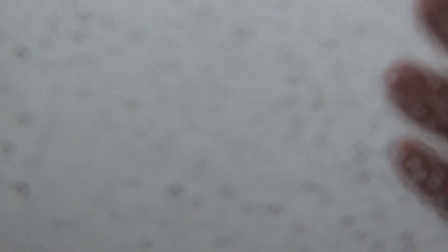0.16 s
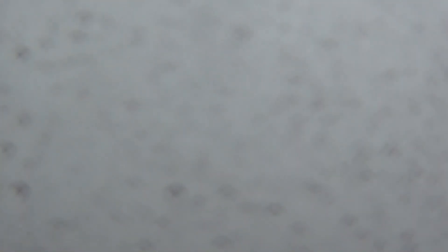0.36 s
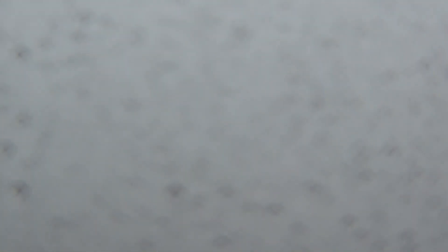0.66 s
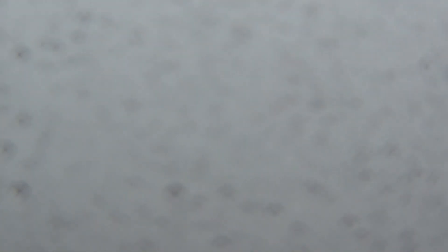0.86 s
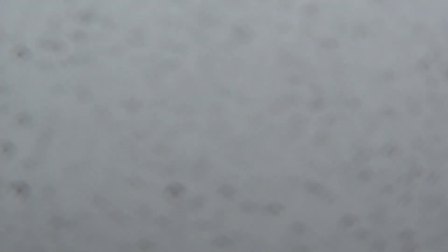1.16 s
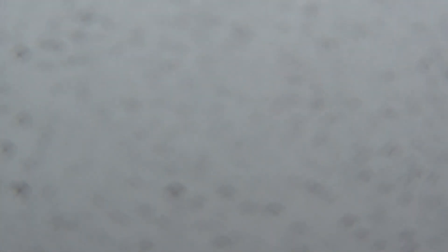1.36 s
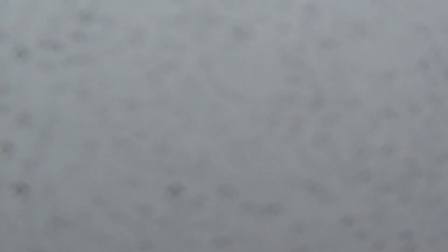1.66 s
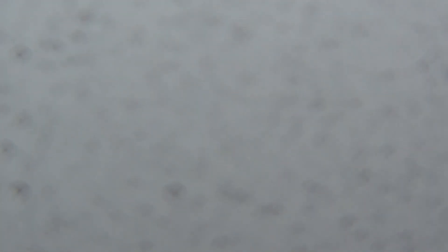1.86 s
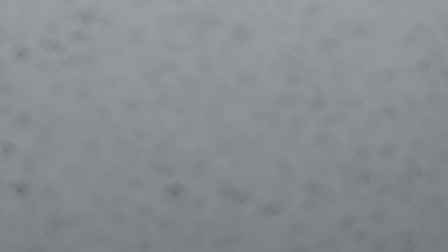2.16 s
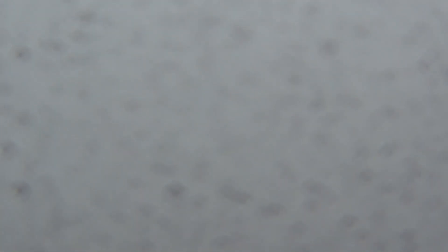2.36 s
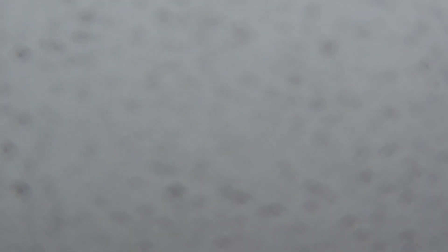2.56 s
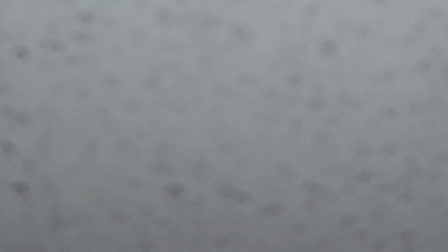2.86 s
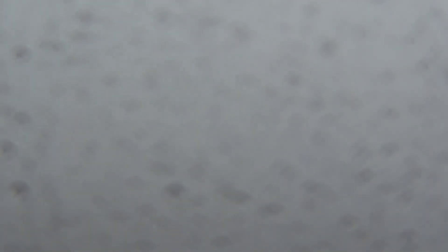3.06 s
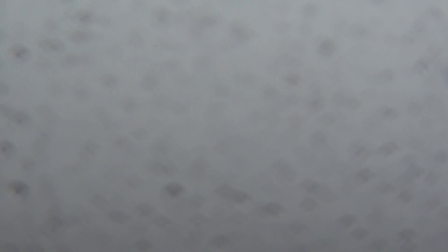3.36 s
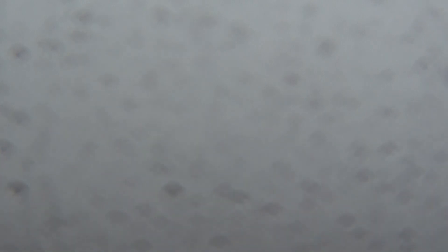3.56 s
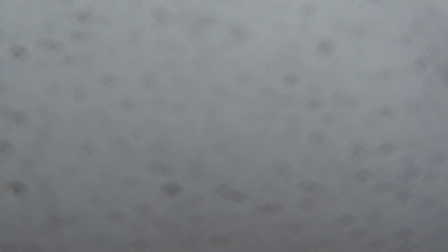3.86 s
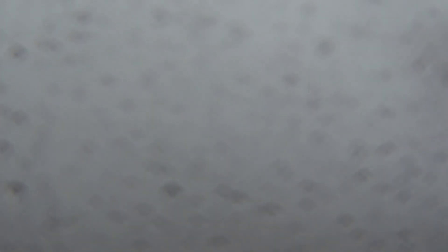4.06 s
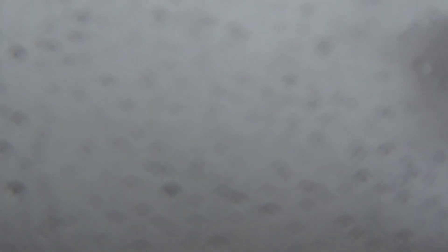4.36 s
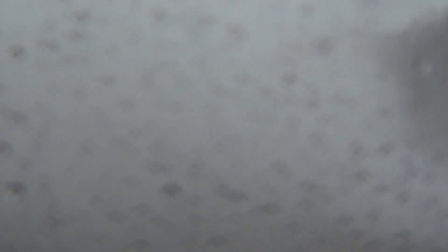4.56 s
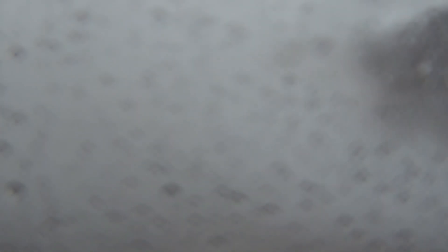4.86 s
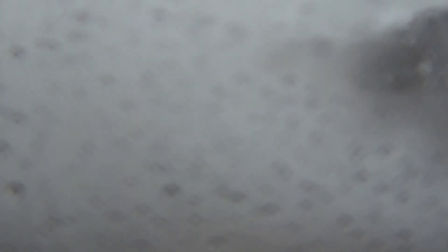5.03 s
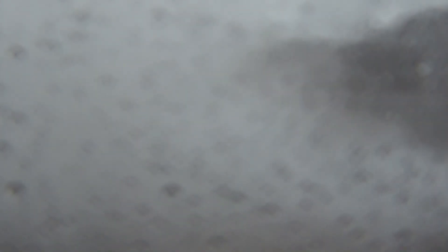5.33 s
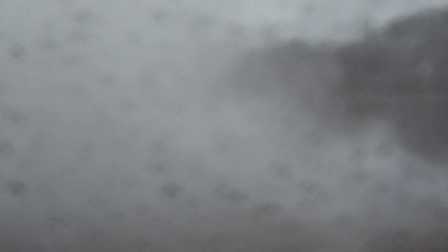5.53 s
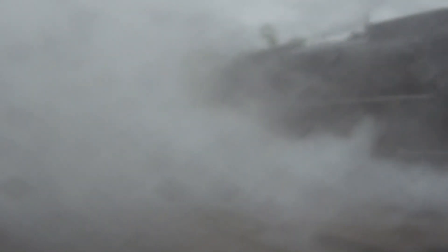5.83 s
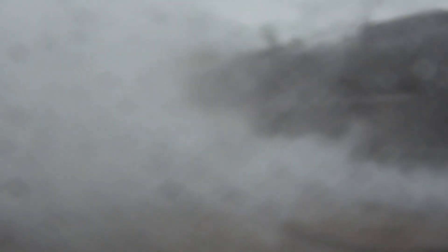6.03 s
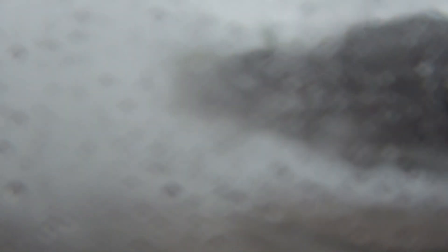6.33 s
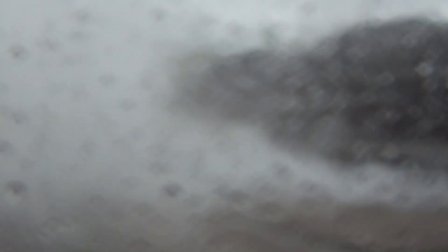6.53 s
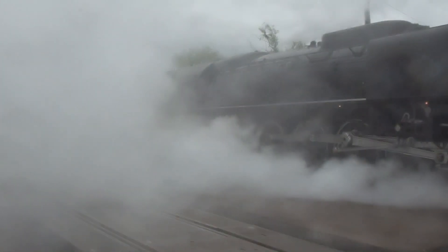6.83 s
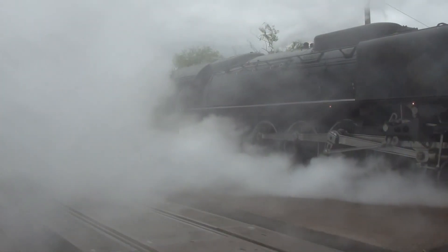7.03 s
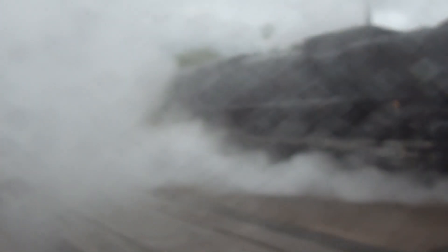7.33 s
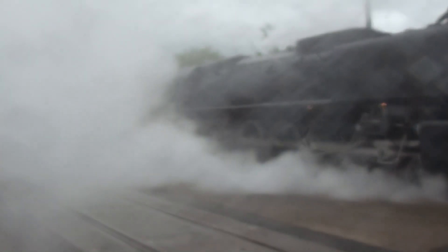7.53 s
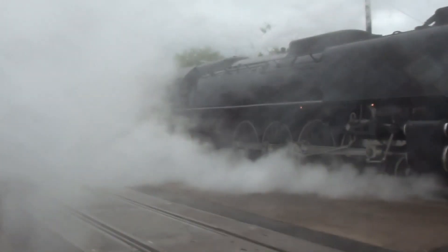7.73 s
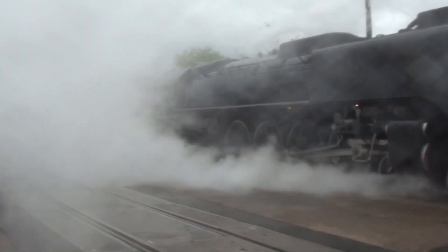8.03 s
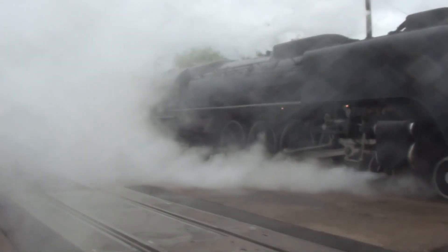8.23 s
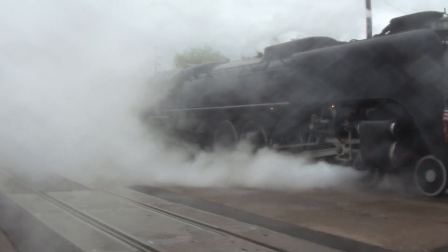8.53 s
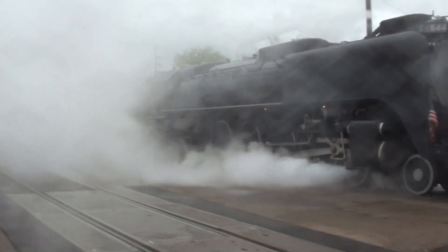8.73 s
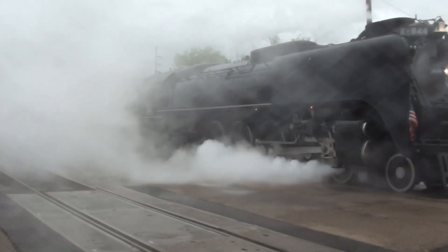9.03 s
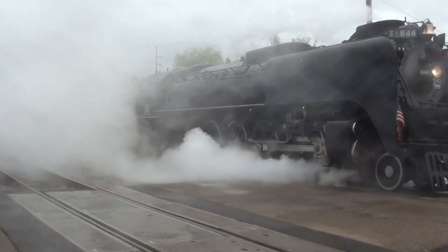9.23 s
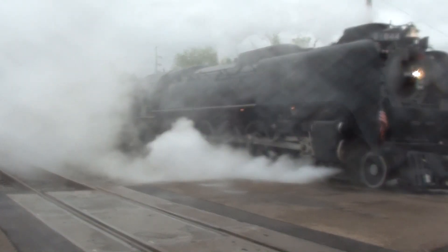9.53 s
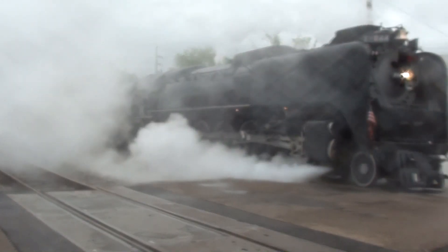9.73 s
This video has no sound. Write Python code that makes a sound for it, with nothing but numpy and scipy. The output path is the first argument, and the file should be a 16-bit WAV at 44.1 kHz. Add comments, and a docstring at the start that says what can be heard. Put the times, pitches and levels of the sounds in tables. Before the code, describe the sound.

Harsh steam jets hiss close by, cut off and return, fall to a soft leak with faint whine and squeals, then blast twice more.

```python
"""A large steam locomotive rolls slowly outdoors with its cylinder cocks open; noise jets hiss in five blasts.
The first is already blowing; its cloud buffets the microphone, muffles the treble, then the jet swings close.
Two more blasts follow. In the lull: a softer noise leak, faint whistles and wheel squeals of wavering sines.
Two last blasts end the scene. Dull noise puffs dot it; a thin sine turbine whine, hum and low noise lie beneath."""
import sys
import numpy as np
from scipy import signal
from scipy.fft import rfft, irfft
from scipy.io import wavfile
from scipy.ndimage import uniform_filter1d

SR = 44100
rng = np.random.default_rng(int(sys.argv[2]) if len(sys.argv) > 2 else 0)


def transcribe(u):
    """Save the signal u as a 16-bit wav file named by the first command-line argument.

    u: samples, shape (n,) or (channels, n), limited to [-1, 1]; the rate is SR.
    q: integer samples, one column per channel.
    """
    v = np.clip(np.atleast_2d(u).T, -1, 1)
    q = np.round(v * 32767).astype(np.int16)
    wavfile.write(sys.argv[1], SR, q)


N = 436149

# cock blasts: open_s, shut_s, opening_s, hiss_db, roar_re_hiss_db, growth_db_per_s,
# sag_at_shut_db (negative: rise), water_sputter_db, ground_echo_0_1, flank_echo_0_1
BLASTS = [ (-0.5, 3.32, 0.02, -22.3, -4.5, -0.25, 5.9, 0.36, 0.11, 0.4),
          (3.521, 4.722, 0.018, -17.8, -7.0, 3, 10.0, 0.1, 0.06, 0.14),
          (4.922, 6.13, 0.0322, -27.5, -5.5, 3.3, 15, 0.65, 0.14, 0.27),
          (8.278, 9.094, 0.1, -20.6, -7, -0.3, 2.0, 0.53, 0.44, 0.06),
          (9.342, 10.4, 0.0259, -21.6, -5.8, 0.7, -2, 0.47, 0.45, 0.26), ]
# jet spectra, one per blast, set by where the jet points: freq_hz, relative_db_per_hz
COLOUR_1 = [(350, -11.5), (470, -17), (650, -5), (850, -2.5), (1150, -6.5), (1600, -1), (2000, -1),
            (3200, -2.5), (4300, -2), (6100, -1.5), (7000, -1), (8200, -3.5), (9500, -10), (12400, -21)]
COLOUR_2 = [(200, -19), (450, -18), (880, -8), (1020, -13), (1350, -6.5), (1850, -8.5), (2700, -6.5),
            (4600, -5), (5400, -5), (7300, -1.5), (8400, -5), (9400, -13.5), (10500, -17.5), (12400, -26.5)]
COLOUR_3 = [(200, -28), (450, -16), (750, -10.5), (1000, -12), (1200, -4.5), (1500, -6.5), (2200, -5),
            (2500, -7.5), (3400, -6.5), (5800, -6.5), (7100, -1), (8500, -10), (10500, -17.5), (12400, -27)]
COLOUR_4 = [(200, -21.5), (420, -9.5), (600, -5), (920, 0.5), (1040, -7.5), (1480, -3), (2200, -6.5),
            (3500, -3.5), (4300, -6), (6400, -4), (7300, -1), (8600, -4), (10500, -17), (12400, -16.5)]
COLOUR_5 = [(260, -16.5), (400, -14), (600, -1.5), (930, -1.5), (1040, -5.5), (1700, -4.5), (2450, -3),
            (2900, -1.5), (3500, -1.5), (5000, -3), (7200, -2.5), (8400, -3), (10500, -14.5), (12400, -21)]
# steam direction: time_s, left_re_right_db (scaled by PAN_SHARE)
PAN = [(0, -0.5), (2.0, 0), (2.7, -2.5), (3.6, -4), (4.8, -3), (6.0, -1.5), (7.3, -0.4), (9.89, -0.55)]
# direction by pitch: freq_hz, share_of_pan_db
PAN_SHARE = [(500, 0), (1400, 0.2), (2400, 1.46), (3300, 0.96), (6200, 1.4), (8500, 1.13), (12000, 0.4)]
SHUT_S = 0.022  # snap of a shutting cock
CLOUD_AT_S, CLOUD_SIGMA_S, CLOUD_DB_PER_OCTAVE = 1.6, 0.14, 1.3  # thickest cloud muffles the treble


def steam():
    """Cock jets and leak add in power; the cloud absorbs treble and turbulence flickers."""
    t, hz = grid(size=1024)
    path = way_out(t, hz, low_cut_hz=183)
    power = leak(t, hz, path)
    colours = (COLOUR_1, COLOUR_2, COLOUR_3, COLOUR_4, COLOUR_5)
    for k, (blast, colour) in enumerate(zip(BLASTS, colours)):
        open_s, shut_s, opening_s = blast[:3]
        on = (t[:, 0] > open_s - 10 * opening_s) & (t[:, 0] < shut_s + 10 * SHUT_S)
        power[on] += jet(blast, colour, t[on], hz, path[on], swings=k == 0)
    pan_db = follow(PAN, t)[0] * read(PAN_SHARE, hz)
    cloud = np.exp(-.5 * ((t - CLOUD_AT_S) / CLOUD_SIGMA_S) ** 2)
    cloud_db = CLOUD_DB_PER_OCTAVE * cloud * treble(hz, corner_hz=2970)
    turbulence = eddies(t, hz, patchy_db=1.09, spray_db=0.9)
    return noise(np.sqrt(power) * amp(-cloud_db) * turbulence, pan_db)


# first jet once near: freq_hz, relative_db_per_hz
COLOUR_1_NEAR = [(250, -19), (450, -7), (700, -3.5), (1000, -0.5), (1300, 1), (1900, 2), (2600, 2),
                 (3200, 0.5), (3800, 1.5), (4500, -2.5), (7200, 0), (8300, -3.5), (9500, -12.5),
                 (12400, -21)]
SWING_AT_S, SWING_S = 2.404, 0.2  # midpoint and time scale of the first jet's swing
SWING_HISS_DB, SWING_ROAR_DB = 4.5, 3  # near gain of the jet, extra gain of its roar
SAG_S = 0.25  # time constant of the sag before shutting
DULLING = 0.4  # treble loss, dB per octave per dB of sag
ROAR_LEAD = 0.94  # a barely open cock roars first: head start in opening times


def jet(blast, colour, t, hz, path, swings, split_hz=3500):
    """Blast power: valve steps and sagging pressure drive nozzle hiss and plume roar."""
    open_s, shut_s, opening_s, hiss_db, roar_db, growth_db, sag_db, sputter_db, ground, flank = blast
    colour_db = read(colour, hz)
    if swings:  # nearer: louder, fuller, echoes appear
        near = ease((t - SWING_AT_S) / SWING_S)
        colour_db = (1 - near) * colour_db + near * read(COLOUR_1_NEAR, hz)
        hiss_db = hiss_db + SWING_HISS_DB * near
        roar_db = roar_db + SWING_ROAR_DB * near
        ground, flank = ground * near, flank * near
    sagged_db = sag_db * np.exp(np.minimum(t - shut_s, 0) / SAG_S)
    pressure_db = growth_db * (t - (open_s + shut_s) / 2) - sagged_db
    colour_db = colour_db - DULLING * sagged_db * treble(hz, corner_hz=7660)
    sputter = drift(len(t), t[1, 0] - t[0, 0], rate_hz=26)[:, None]
    level = amp(hiss_db + pressure_db + sputter_db * sputter) * ease((shut_s - t) / SHUT_S)
    opened = (t - open_s) / opening_s
    shape = amp(colour_db) * path * echoes(t, hz, ground, flank)
    high = 1 / np.sqrt(1 + (split_hz / (hz + 1)) ** 6)
    low = np.sqrt(1 - high ** 2)
    hiss = ease(opened) * unit(shape * high)
    roar = ease(opened + ROAR_LEAD) * amp(roar_db) * unit(shape * low)
    return level ** 2 * (hiss ** 2 + roar ** 2)


# leak level: time_s, level_db
LEAK = [(3.42, -38.5), (4.82, -40.5), (6.25, -48.5), (7.3, -48.5), (7.85, -44.5), (9.2, -33)]
# leak spectrum: freq_hz, relative_db_per_hz
LEAK_COLOUR = [(250, -8), (450, -1.5), (750, 4), (1100, -0.5), (1500, 0), (2500, 0.5), (3400, -1),
               (4300, -0.5), (5000, -2), (6800, -0.5), (8300, -2), (9200, -8.5), (11000, -12), (12400, -17)]
LEAK_GROUND = 0.16  # ground echo strength, 0-1


def leak(t, hz, path):
    """Power of steam leaking on the far side, with a ground reflection only."""
    shape = unit(amp(read(LEAK_COLOUR, hz)) * path * echoes(t, hz, LEAK_GROUND, 0))
    return (amp(follow(LEAK, t)[0]) * shape) ** 2


# hollows between frames and ground, ringing (+) or swallowing (-): centre_hz, width_hz, gain_db
HOLLOWS = [(886, 54, 1.3), (1030, 65, -2), (1130, 91, 1), (1357, 100, 1.5), (1855, 230, -1.5),
           (2490, 230, -2.5), (4370, 340, -0.5), (7150, 250, 1.3)]


def way_out(t, hz, low_cut_hz):
    """Gain from cocks to listener: hollows, weak bass radiation, scatter."""
    hollows_db = sum(db * np.exp(-(2 * (hz - centre) / width) ** 2) for centre, width, db in HOLLOWS)
    radiation = hz ** 2 / (hz ** 2 + low_cut_hz ** 2)  # a jet radiates little bass
    return amp(hollows_db) * radiation * scatter(t, hz, ripple_db=1.1)


def scatter(t, hz, ripple_db, count=24):
    """Faint echoes off wheels and rods ripple the spectrum finely and shift as the engine rolls."""
    ranges = rng.uniform([.003, -1, 0], [.009, 1, 1], (count, 3))
    delay_s, glide_hz, start_cycles = ranges.T[:, :, None]
    moving = np.exp(2j * np.pi * glide_hz * t[:, 0]).T
    ripple = moving @ np.exp(2j * np.pi * (delay_s * hz + start_cycles))
    return amp(ripple_db * evened(ripple.real))


# echo delays shifting as the engine rolls: time_s, ground_ms, flank_ms
ECHO_DELAYS = [(2.3, 1.25, 0.76), (2.9, 1.5, 0.77), (3.8, 1.48, 0.785), (5.4, 1.52, 0.62),
               (5.9, 1.53, 0.556), (8.5, 1.477, 0.67), (9.89, 1.437, 0.56)]


def echoes(t, hz, ground, flank):
    """Comb gains of reflections off the ground and the engine's side."""
    ground_ms, flank_ms = follow(ECHO_DELAYS, t)
    off_ground = reflection(ground_ms, ground, hz, blur_hz=5100, again=0.52, phase=0.81)
    off_flank = reflection(flank_ms, flank, hz, blur_hz=4580, again=0.8)
    return off_ground * off_flank


def reflection(delay_ms, strength, hz, blur_hz, again, phase=0):
    """An echo and its further bounces comb the spectrum; plume width blurs the treble comb."""
    turn = np.exp(1j * (2 * np.pi * hz * delay_ms / 1000 - phase))
    echo = np.clip(strength, 0, .8) / (1 + (hz / blur_hz) ** 4) * turn
    bounced = echo / (1 - np.clip(again, 0, 1) * echo)
    return abs(1 + bounced) / np.sqrt(1 + abs(echo) ** 2)


def eddies(t, hz, patchy_db, spray_db):
    """Turbulence: drifting patches at all pitches, and spray flickering in the treble."""
    patches = rng.standard_normal((len(t), len(hz)))
    patches = uniform_filter1d(patches, size=14, axis=0)
    patches = evened(uniform_filter1d(patches, size=6, axis=1))
    spray = drift(len(t), t[1, 0], rate_hz=28)[:, None] * np.clip((hz - 5500) / 5000, 0, 2)
    return amp(patchy_db * patches + spray_db * spray)


# cloud on the microphone: freq_hz, relative_db_per_hz
BUFFET_COLOUR = [(20, -18), (40, -16), (70, -8), (100, -3.5), (150, -0.5), (168, 4), (188, 0.5), (310, 2),
                 (390, -13.5), (500, -22), (900, -41)]
# gusts on the microphone: time_s, level_db, sigma_s
GUSTS = [(0.02, -41.5, 0.035), (0.09, -36.5, 0.014), (1.14, -37, 0.019), (1.64, -43, 0.04),
         (1.7, -38, 0.022), (1.97, -45, 0.03)]
BUFFET_START_DB, BUFFET_FALL_DB_PER_S = -43, 0.9  # the cloud slowly thins
BUFFET_END_S, BUFFET_CLEAR_S = 2.96, 0.15  # drift-off start and time constant
FLUTTER_DB, FLUTTER_HZ = 2, 9.4  # unevenness of the push


def buffeting():
    """The steam cloud pushes on the microphone: fluttering low noise with gusts."""
    t, hz = grid(size=2048)
    flutter_db = FLUTTER_DB * drift(len(t), t[1, 0], FLUTTER_HZ)[:, None]
    clearing = np.exp(-np.maximum(t - BUFFET_END_S, 0) / BUFFET_CLEAR_S)
    cloud = amp(BUFFET_START_DB - BUFFET_FALL_DB_PER_S * t + flutter_db) * clearing
    push = cloud + swells(GUSTS, t)
    return noise(push * unit(amp(read(BUFFET_COLOUR, hz))))


# exhaust and steam puffs: time_s, level_db, sigma_s
PUFFS = [(1.712, -29.5, 0.025), (7.668, -43.5, 0.032), (9.15, -43, 0.015)]
# puff spectrum: freq_hz, relative_db_per_hz
PUFF_COLOUR = [(40, -18), (130, 1), (280, 3), (450, -1), (720, 5), (1000, -3), (1500, -1), (3000, -12),
               (8000, -23)]


def puffs():
    """Short puffs of exhaust and steam: bell-shaped bursts of dull noise."""
    t, hz = grid(size=512)
    return noise(swells(PUFFS, t) * unit(amp(read(PUFF_COLOUR, hz))))


# turbine level: time_s, level_db
WHINE = [(3.4, -55), (5.9, -51.5), (6.4, -54.5), (7.08, -48.5), (7.35, -53), (7.75, -50), (8.4, -51),
         (9.2, -54), (9.89, -51)]
# turbine partials: pitch_hz, relative_db, waver_hz
WHINE_LINES = [(4163, 1, 2.5), (3758, -11.5, 3), (4511, -18, 8.6), (5760, -22.5, 12), (8323, -20, 9),
               (2550, -19, 5.4)]
FADE_DB, FADE_HZ = 0.8, 7  # steam drifting across the whine


def turbine(t):
    """Whine of wavering partials that shimmers and fades as steam drifts across, slightly right."""
    shimmer_db = 1.2 * waver(rate_hz=16)
    fade_db = FADE_DB * waver(FADE_HZ)
    partials = sum(amp(db) * tone(hz, width) for hz, db, width in WHINE_LINES)
    whine = amp(follow(WHINE, t)[0] + fade_db + shimmer_db) * partials
    return whine * amp([[-.3], [.3]])


# leak whistles: time_s, level_db, sigma_s
WHISTLES = [(6.4, -59, 0.11), (7.32, -55, 0.14), (7.78, -57, 0.09)]


def whistle(t):
    """A leak whistles faintly: two close unsteady tones beat in short swells."""
    pair = tone(hz=7520, width_hz=22) + .6 * tone(hz=7370, width_hz=35)
    return swells(WHISTLES, t) * evened(pair)


# wheel squeals: time_s, level_db, sigma_s
SQUEALS = [(7.13, -57.5, 0.054), (7.52, -58, 0.05), (7.89, -54, 0.04)]


def squeal(t):
    """A wheel rubs on the rail: brief swells of one nearly steady tone."""
    return swells(SQUEALS, t) * tone(hz=1540, width_hz=3.4)


# machinery hum: pitch_hz, level_db, waver_hz
HUM = [(117, -76, 6.75), (166, -73, 9.25), (974, -73, 2.3)]


def hum():
    """Machinery hum: constant-level tones of slightly wavering pitch."""
    return sum(amp(db) * tone(hz, width) for hz, db, width in HUM)


# running gear and fire: time_s, level_db
RUMBLE = [(3.4, -67), (4.2, -56), (4.7, -65.5), (7.4, -61.5), (8.2, -55.5), (9.89, -59)]
# rumble spectrum: freq_hz, relative_db_per_hz
RUMBLE_COLOUR = [(20, -17), (40, -14), (70, -5), (110, -4), (140, -4), (170, -11), (200, -0.5), (330, -5),
                 (500, -4), (900, -53)]


def rumble():
    """Running gear and fire: low noise of slowly changing level."""
    t, hz = grid(size=2048)
    return noise(amp(follow(RUMBLE, t)[0]) * unit(amp(read(RUMBLE_COLOUR, hz))))


# left-right correlation, compact source: freq_hz, likeness_0_1
SAME = [(40, 0.93), (300, 0.96), (600, 0.98), (1300, 0.98), (2450, 0.97), (3500, 0.95), (6000, 0.97),
        (9000, 0.99), (12000, .995)]
# left-right correlation, plume round the listener: freq_hz, likeness_0_1
SAME_WIDE = [(40, 0.96), (400, 0.61), (1350, 0.92), (2400, 0.82), (4000, 0.89), (6200, 0.52), (7600, 0.7),
             (9500, 0.56), (12000, 0.65)]
# plume spread round the listener: time_s, spread_0_1
SPREAD = [(2.1, 0.2), (2.7, 1), (4.4, 0.75), (4.85, 0.11), (9.89, 0)]


def noise(shape, pan_db=0):
    """Stereo noise of the given short-time spectrum; common and opposite parts set the likeness."""
    size = 2 * (shape.shape[1] - 1)
    t, hz = grid(size)
    a, b, c, d = rng.standard_normal((4,) + shape.shape)
    spread = follow(SPREAD, t)[0]
    same = np.clip((1 - spread) * read(SAME, hz) + spread * read(SAME_WIDE, hz), 0, 1)
    mid = np.sqrt((1 + same) / 2) * (a + 1j * b)
    side = np.sqrt((1 - same) / 2) * (c + 1j * d)
    left, right = (mid + side) * amp(pan_db / 2), (mid - side) * amp(-pan_db / 2)
    spectra = np.array([left, right]) * shape
    return signal.istft(spectra.transpose(0, 2, 1), nperseg=size, noverlap=size * 3 // 4)[1][:, :N]


def tone(hz, width_hz):
    """Sine of rms 1 whose pitch wavers by width_hz rms."""
    pitch_hz = hz + width_hz * waver(rate_hz=45)
    return np.sqrt(2) * np.sin(2 * np.pi * np.cumsum(pitch_hz) / SR)


def waver(rate_hz):
    """Smooth chance at every sample, interpolated from a coarse drift of rms 1."""
    step = 64
    coarse = drift(N // step + 2, step / SR, rate_hz)
    return np.interp(np.arange(N) / step, np.arange(len(coarse)), coarse)


def drift(count, step_s, rate_hz):
    """Smooth chance of rms 1: white noise under a Gaussian low-pass, 1/e at rate_hz."""
    f = np.fft.rfftfreq(count, step_s)
    return evened(irfft(rfft(rng.standard_normal(count)) * np.exp(-(f / rate_hz) ** 2), count))


def swells(rows, t):
    """Sum of bell-shaped gains, one per event."""
    return sum(amp(db) * np.exp(-.5 * ((t - s) / sigma_s) ** 2) for s, db, sigma_s in rows)


def ease(u):
    """Smooth step from 0 to 1, half way at u = 0."""
    return .5 + .5 * np.tanh(u / 2)


def treble(hz, corner_hz):
    """Octaves above the corner; zero below it."""
    return np.log2(np.maximum(hz / corner_hz, 1))


def amp(db):
    """Amplitude from dB."""
    return 10 ** (np.asarray(db) / 20)


def evened(x):
    """Scales to rms 1."""
    return x / np.sqrt(np.mean(x ** 2) + 1e-20)


def unit(shape):
    """Gives each frame's spectrum a power of 1."""
    return shape / np.sqrt(np.sum(shape ** 2, axis=-1, keepdims=True) + 1e-20)


def read(points, hz):
    """Interpolates a spectrum on a log-frequency axis."""
    f, value = np.transpose(points)
    return np.interp(np.log(hz + 1), np.log(f + 1), value)


def follow(rows, t):
    """Interpolates every column of a time curve at t."""
    s, *columns = np.transpose(rows)
    return [np.interp(t, s, c) for c in columns]


def grid(size):
    """Frame times (column, s) and bin frequencies (row, Hz) of short-time spectra."""
    frame_s = np.arange(N * 4 // size + 5)[:, None] * size / 4 / SR
    return frame_s, np.fft.rfftfreq(size, 1 / SR)


def scene():
    """Steam over the engine's thin tones and low sounds."""
    t = np.arange(N) / SR
    tones = turbine(t) + whistle(t) + squeal(t) + hum()
    return steam() + buffeting() + puffs() + tones + rumble()


EDGE_HZ = 12560


def record(dry):
    """Band limit: a steep linear-phase low-pass at EDGE_HZ."""
    low_pass = signal.firwin(511, EDGE_HZ, window=("kaiser", 9), fs=SR)
    return signal.oaconvolve(dry, low_pass[None], "same")


dry = scene()
out = record(dry)
transcribe(out)
```